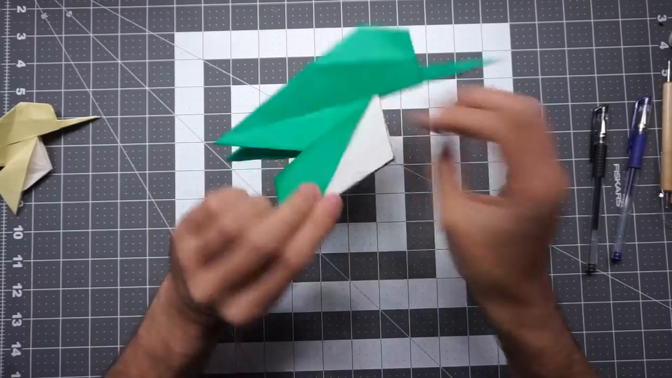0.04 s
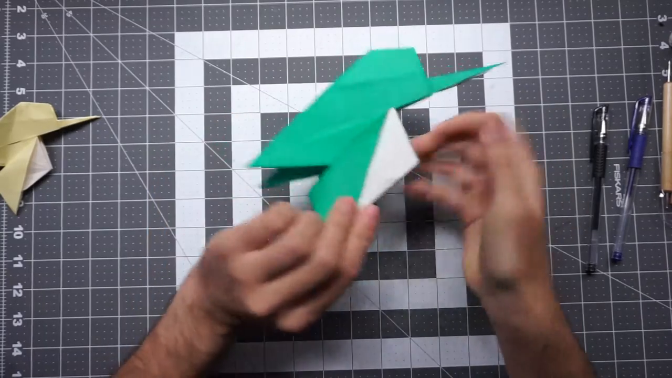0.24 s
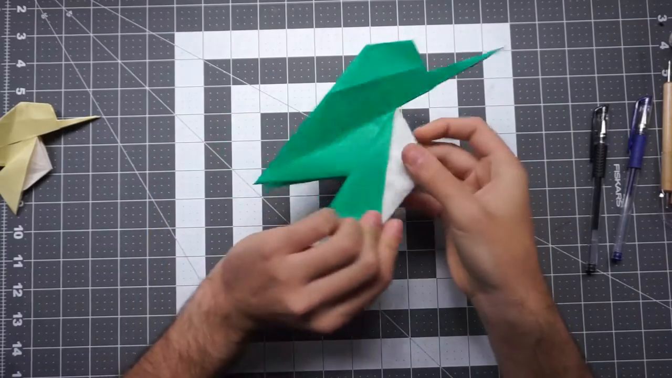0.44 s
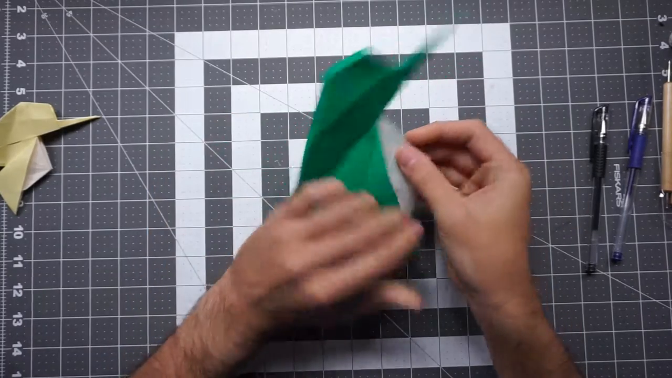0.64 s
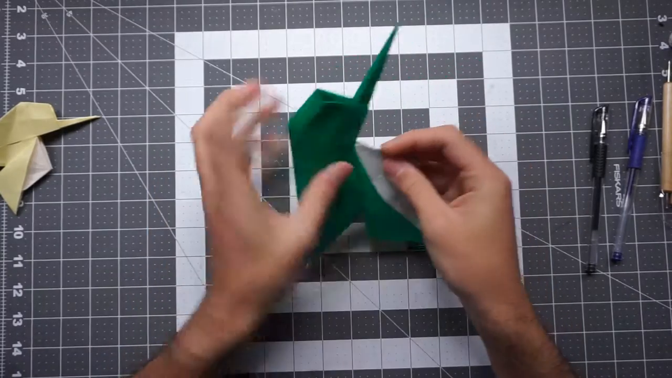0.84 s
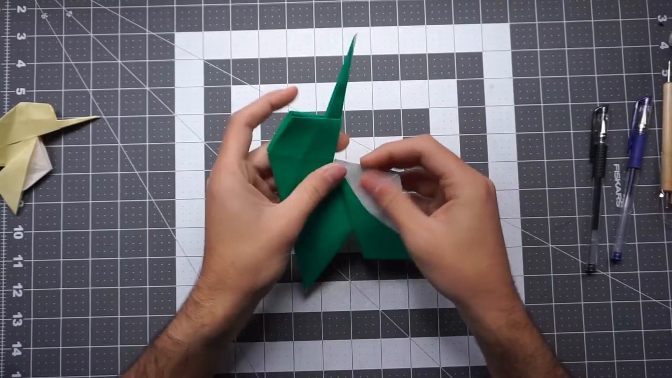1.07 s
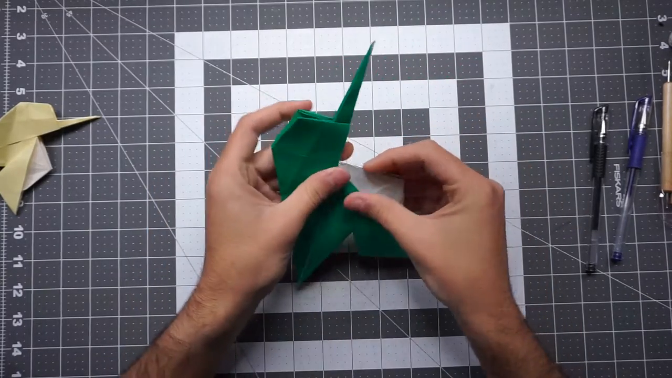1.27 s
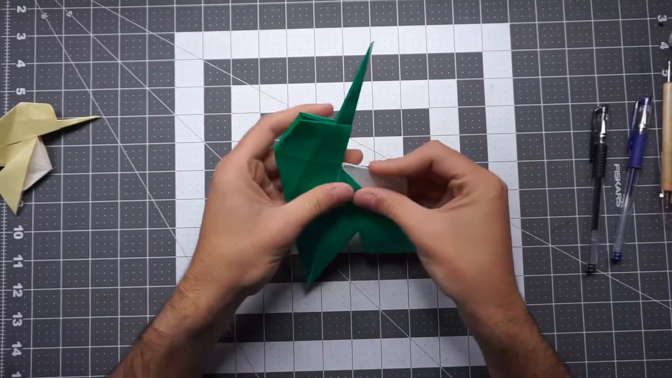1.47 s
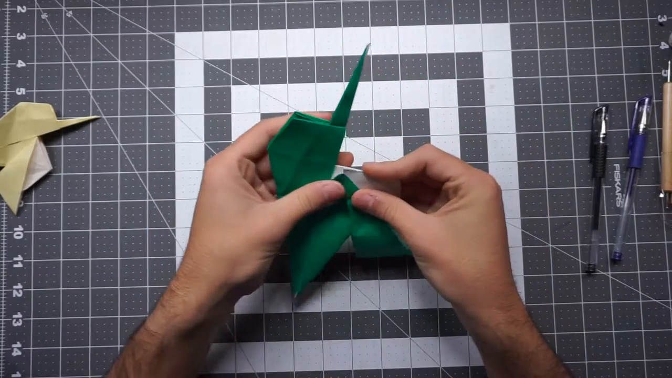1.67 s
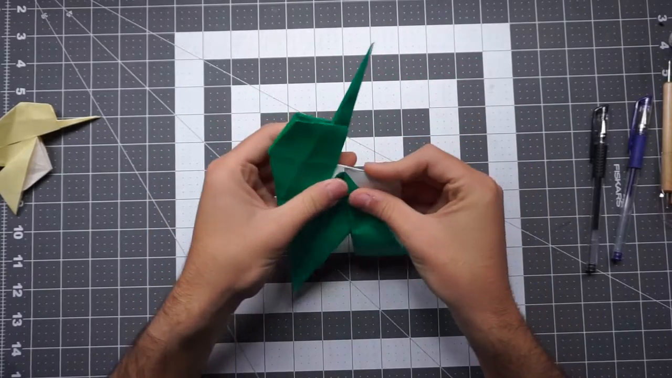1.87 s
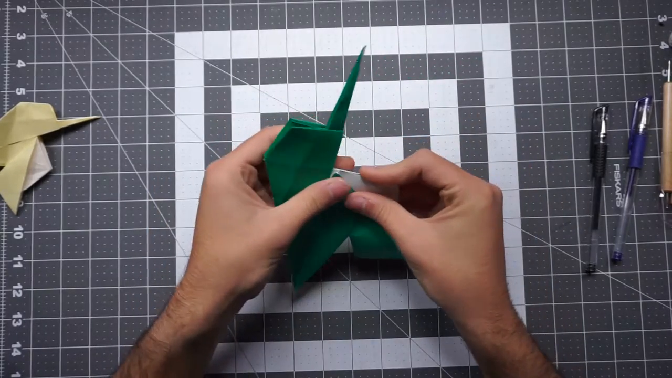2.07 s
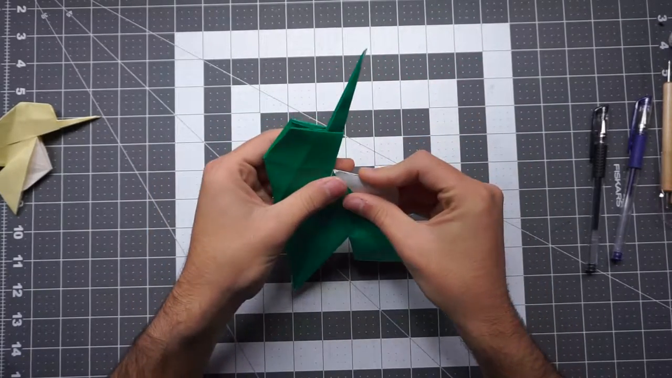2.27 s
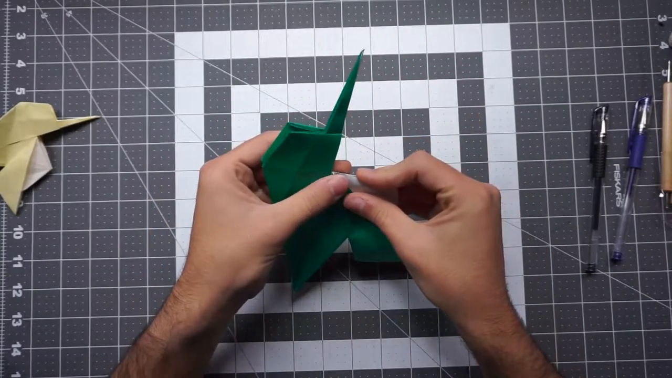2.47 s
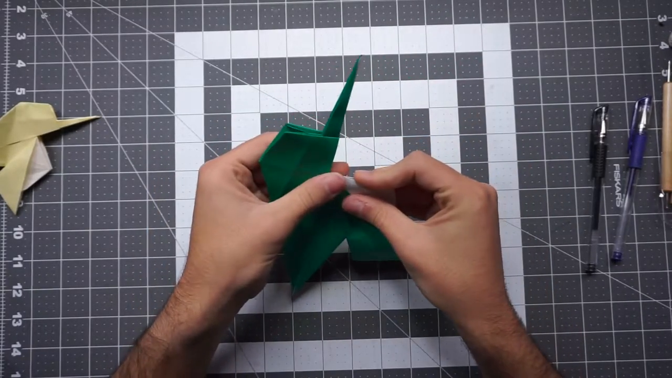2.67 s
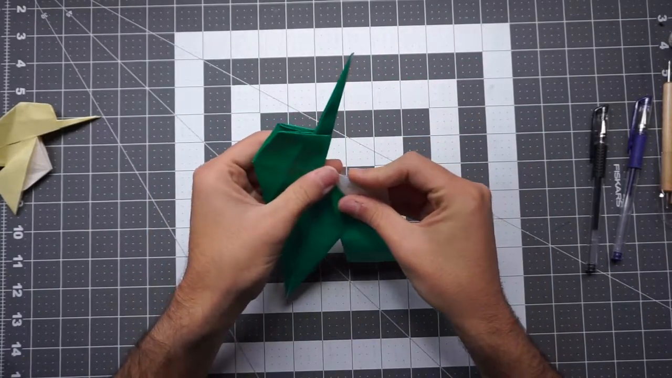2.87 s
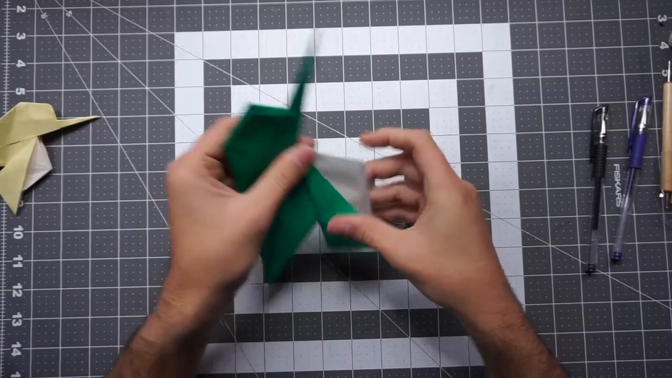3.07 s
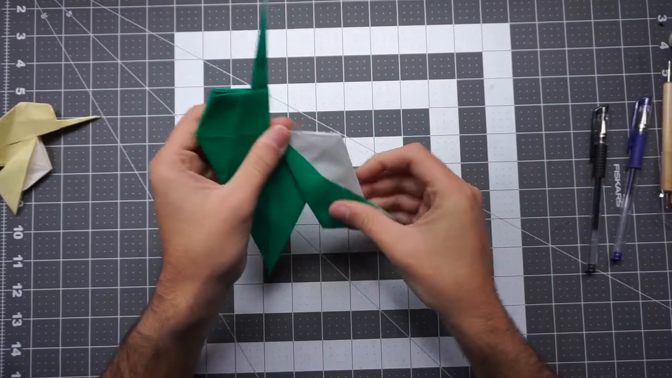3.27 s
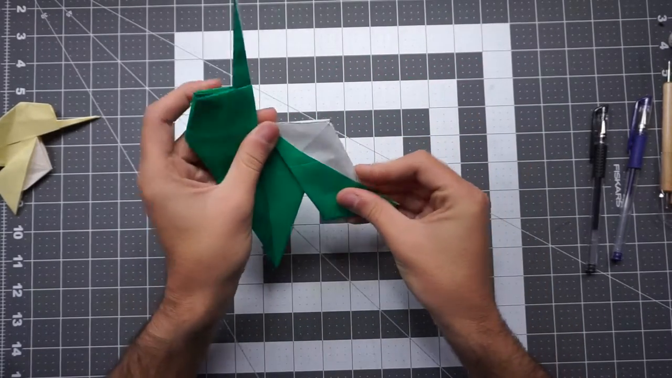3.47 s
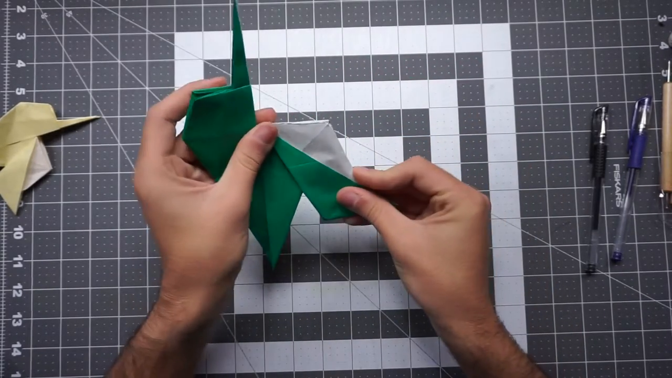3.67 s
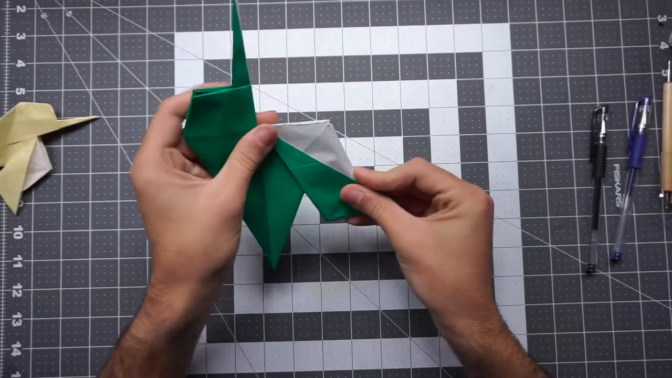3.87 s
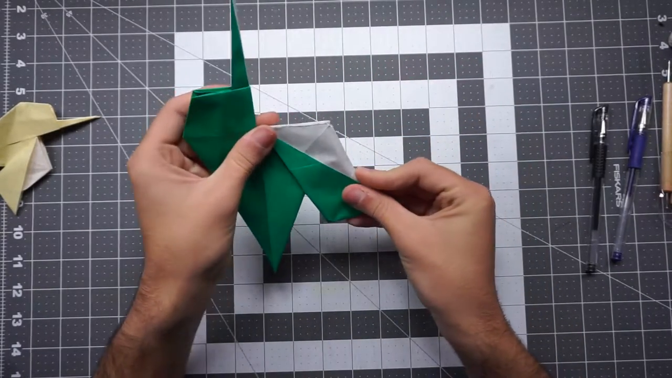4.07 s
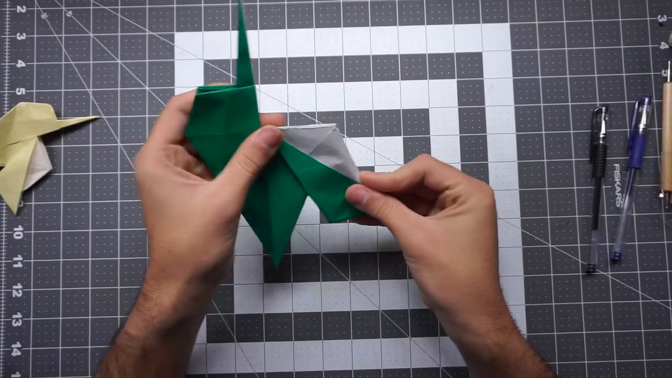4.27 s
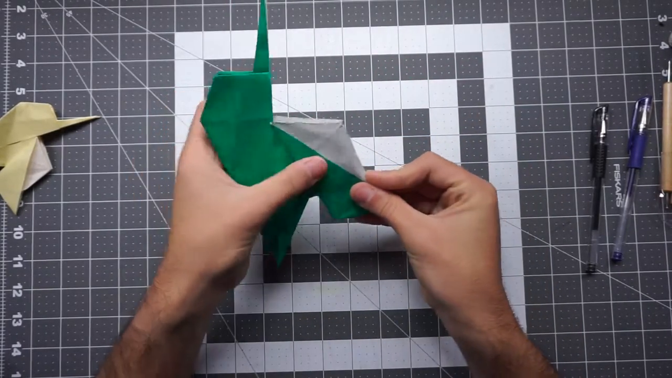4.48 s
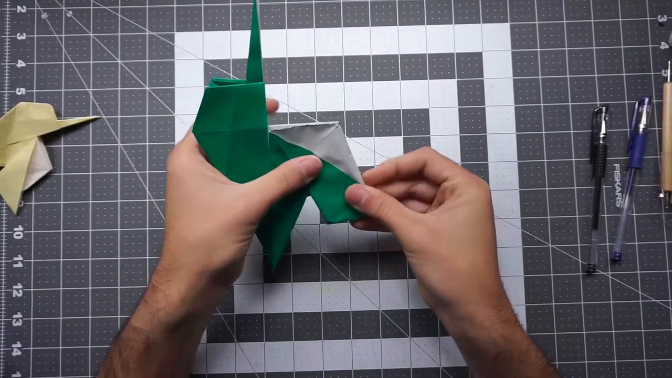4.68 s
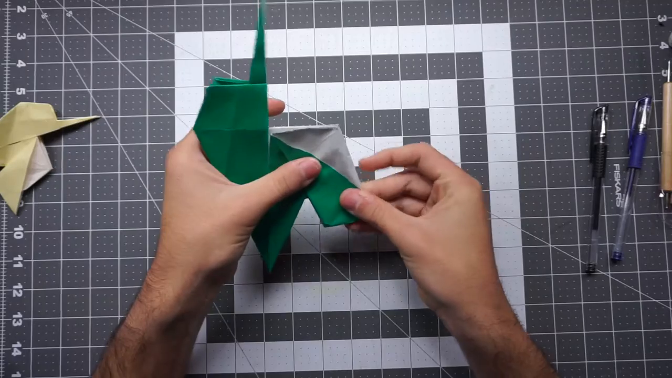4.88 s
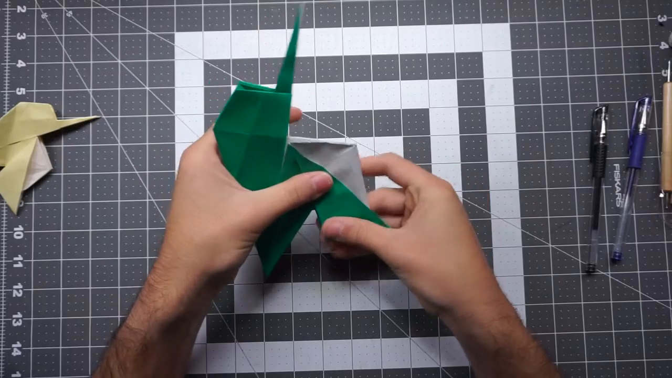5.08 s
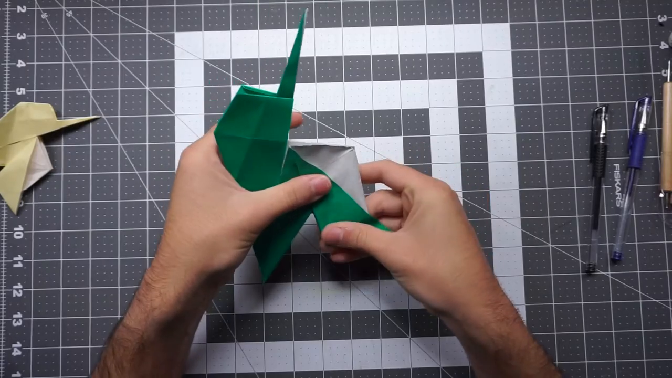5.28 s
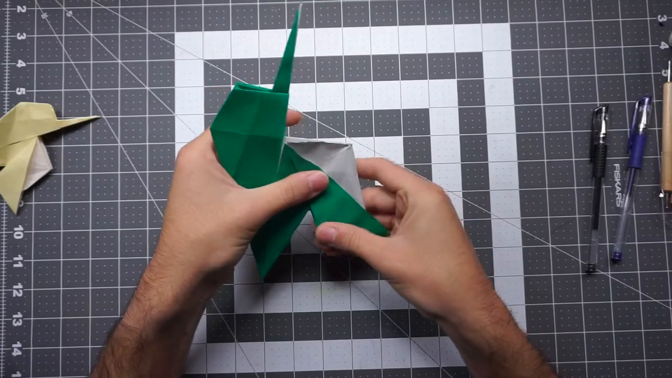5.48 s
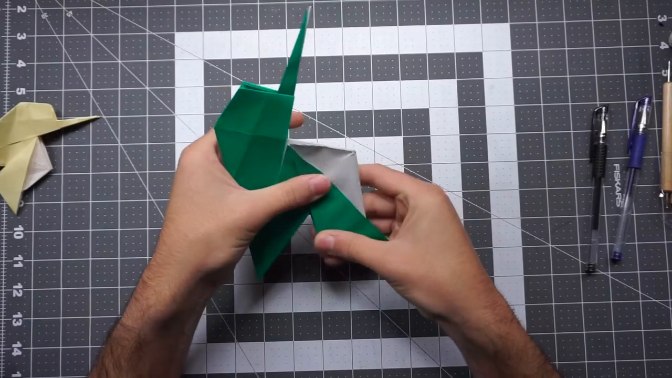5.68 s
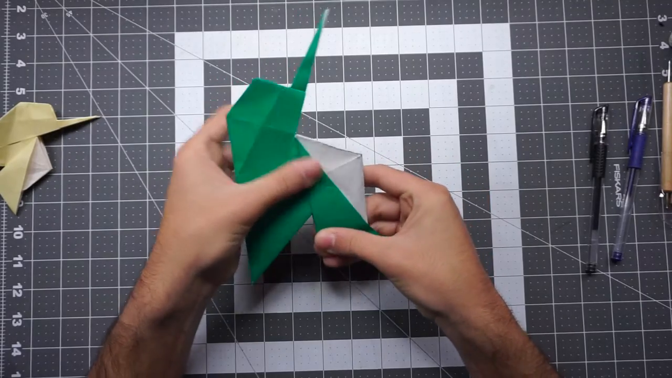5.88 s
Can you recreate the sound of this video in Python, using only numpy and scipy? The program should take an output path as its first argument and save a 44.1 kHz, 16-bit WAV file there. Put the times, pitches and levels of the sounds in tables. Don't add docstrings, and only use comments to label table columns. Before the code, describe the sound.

Stiff paper is folded close up, with bright sliding hiss, crisp creasing snaps and crackles, over quiet room noise and faint traffic rumble.

```python
import sys
import numpy as np
from scipy import signal
from scipy.fft import rfft, irfft, next_fast_len
from scipy.io import wavfile
from scipy.ndimage import uniform_filter1d, map_coordinates

SR = 44100
rng = np.random.default_rng(int(sys.argv[2]) if len(sys.argv) > 2 else 0)


def boost(x):
    u = np.asarray(x, float) / 20
    return 10 ** u


def to_wav(sig):
    pcm = np.clip(np.atleast_2d(sig), -1, 1) * 32767
    pcm = np.round(pcm).astype(np.int16)
    wavfile.write(sys.argv[1], SR, pcm.T)


N = 261513


def unit(x):
    return x / np.sqrt(np.mean(x ** 2) + 1e-20)


def along(points, hz):
    f, v = np.transpose(points)
    return np.interp(np.log(hz + 1), np.log(f + 1), v)


def curve(points):
    s, v = np.transpose(points)
    return np.interp(np.arange(N) / SR, s, v)


def wobble(rate_hz):
    knots = rng.standard_normal(int(N * rate_hz / SR) + 4)
    return map_coordinates(knots, [np.arange(N) * rate_hz / SR])


def filtered(x, response):
    m = next_fast_len(N + SR // 2)
    hz = np.fft.rfftfreq(m, 1 / SR)
    return irfft(rfft(x, m) * response(hz), m)[..., :N]


def pair(source, spectrum, alike):
    def response(hz):
        turn = np.arccos(np.clip(along(alike, hz), -1, 1)) / 2
        return boost(along(spectrum, hz)) * [np.cos(turn), np.sin(turn)]

    mid, side = filtered(source, response)
    return unit(np.array([mid + side, mid - side]))


def sides(pan_db):
    return boost(np.array([pan_db / 2, -pan_db / 2]))


def swells(s, db, rise_s, fall_s):
    hop = 64
    late_s = np.arange(0, N + hop, hop)[:, None] / SR - s
    drop_db = 20 * np.where(late_s < 0, -late_s / rise_s, late_s / fall_s)
    power = boost(2 * (db - drop_db)).sum(1)
    return np.interp(np.arange(N) / hop, np.arange(len(power)), np.sqrt(power))


def air():
    # f/Hz, density/dB
    rumble_spectrum = [(12, -51), (20, -15), (95, -11.5), (127, -10), (227, -15.5), (337, -25.5),
                       (365, -37), (700, -72)]
    # f/Hz, density/dB
    floor_spectrum = [(150, -45), (337, -27.5), (416, -31), (463, -31), (872, -30.5), (1060, -27.5),
                      (1260, -33.5), (11000, -47.5)]
    # f/Hz, correlation/1
    alike = [(30, 1), (125, 0.82), (300, 0.051), (600, 0.083), (1000, 0.093), (3000, 0.048), (10000, 0.1)]
    # t/s, level/dB
    swell = [(0, -61), (1.7, -63), (2.4, -64), (4.2, -58.5), (4.6, -62.5), (5.93, -61)]
    noise = rng.standard_normal((2, 2, N))
    rumble = pair(noise[0], rumble_spectrum, alike)
    rest = pair(noise[1], floor_spectrum, alike)
    rumble_db = curve(swell) + 1.1 * wobble(4.08)
    return boost(rumble_db) * rumble + boost(-59) * rest


def grit(rate_hz, spread_db, patchy_db, smooth):
    size = (rng.random(N) < rate_hz / SR) * boost(spread_db * np.minimum(rng.exponential(size=N), 2.2))
    ticks = unit(size * rng.standard_normal((2, N))) + smooth * rng.standard_normal((2, N))
    z = signal.stft(ticks, nperseg=128)[2]
    field = uniform_filter1d(rng.standard_normal(z.shape[1:]), size=2, axis=0)
    field = uniform_filter1d(field, size=16, axis=1)
    clumps_db = patchy_db * 1.1 * wobble(110)
    patched = signal.istft(z * boost(patchy_db * unit(field)), nperseg=128)[1][:, :N]
    return boost(clumps_db) * patched


def slides():
    # f/Hz, density/dB
    hiss_spectrum = [(1500, -51), (3000, -24), (4000, -11), (5500, -6.5), (8000, -3), (11000, 0.5)]
    # f/Hz, density/dB
    rustle_spectrum = [(200, -12), (500, -3.5), (1000, -3), (2000, 0.5), (3000, -1.5), (4200, 1),
                       (6000, -8), (11000, -7)]
    # most pressure t/s, skin hiss level/dB, sheet rustle level/dB, rise/s, fall/s (20 dB)
    strokes = [(0.0, -42, -46, .05, 0.7), (0.285, -28, -32.5, 0.017, 0.021), (.37, -32, -44, 0.033, 0.022),
               (.478, -26.5, -36, 0.058, 0.062), (.56, -33.5, -47, 0.1, 0.15),
               (.663, -33.5, -47, .15, 0.029), (.78, -34.5, -40.5, 0.038, 0.025),
               (0.903, -35.5, -48, 0.05, 0.63), (1.345, -38, -43.5, .04, 0.06),
               (1.521, -42.5, -50, 0.047, 0.11), (1.645, -54.5, -52.5, 0.16, 0.16),
               (1.958, -32, -50, 0.055, 0.025), (1.99, -52, -62, .2, .2),
               (2.847, -55.5, -65.5, 0.28, 0.075), (2.996, -34.5, -46.5, 0.032, 0.29),
               (3.214, -35, -44.5, 0.12, 0.05), (3.38, -42.5, -53.5, 0.12, 0.094),
               (4.187, -63, -69, 0.071, 0.05), (4.387, -35, -40, 0.061, 0.12),
               (4.586, -46, -45, 0.36, 0.12), (4.992, -36, -60, 0.053, 0.13),
               (5.097, -62, -49.5, 0.047, 0.056), (5.411, -49.5, -55, 0.15, 0.22),
               (5.827, -39, -38, 0.044, 0.078), (5.93, -32.5, -53, 0.11, .1)]
    rest_hiss_db, rest_rustle_db = -64, -66.5
    dwell_s = 0.01
    sheet_lag = 1.14
    s, hiss_db, rustle_db, rise_s, fall_s = np.transpose(strokes)
    hiss = grit(rate_hz=5200, spread_db=4, patchy_db=3, smooth=1.6)
    hiss = pair(hiss, hiss_spectrum, [(3000, 0.62)])
    rustle = grit(rate_hz=700, spread_db=3.5, patchy_db=2.5, smooth=1.16)
    rustle = pair(rustle, rustle_spectrum, [(1200, 0.85), (3000, 0.4)])
    skin = uniform_filter1d(swells(s, hiss_db + 0.5, rise_s, fall_s), round(dwell_s * SR))
    skin = skin + boost(rest_hiss_db)
    sheet = swells(s, rustle_db + 2.0, sheet_lag * rise_s, sheet_lag * fall_s) + boost(rest_rustle_db)
    return sides(1.4 * wobble(3.13)) * (skin * hiss + sheet * rustle)


def rattle():
    # f/Hz, density/dB
    resonances = [(870, -24), (940, 3), (1000, 1.5), (1065, 5.5), (1125, -6), (1192, -1), (1260, -24)]
    # t/s, level/dB
    pulses = [(.01, -54), (.16, -57), (.37, -57), (.49, -50), (.7, -55), (.76, -58), (.93, -55),
              (.97, -56), (1.03, -59), (1.09, -59), (1.17, -60), (1.24, -59), (1.37, -53), (1.45, -54),
              (1.49, -57), (1.56, -57), (1.61, -58), (1.69, -58), (1.76, -59), (1.83, -61), (1.91, -58),
              (1.97, -61), (2.04, -61), (2.1, -58), (2.17, -58), (2.23, -62), (2.49, -59), (2.56, -57),
              (2.63, -60), (2.69, -59), (2.77, -63), (2.83, -63), (2.9, -61), (2.97, -55), (3.03, -58),
              (3.1, -58), (3.3, -56), (3.37, -56), (3.43, -55), (3.55, -62), (3.69, -63), (3.76, -61),
              (3.92, -63), (4.03, -56), (4.08, -60), (4.27, -62), (4.46, -56), (4.58, -56), (4.94, -58),
              (5.29, -63), (5.38, -61), (5.5, -60), (5.57, -60), (5.63, -60), (5.71, -62), (5.77, -60),
              (5.88, -58)]
    hum = pair(rng.standard_normal((2, N)), resonances, [(1000, 0.94)])
    power = np.abs(uniform_filter1d(hum.mean(0) ** 2, size=700))
    steady = unit(hum / np.sqrt(power + .05))
    flutter_db = 1.5 * wobble(40)
    s, db = np.transpose(pulses)
    return swells(s, db + 4, rise_s=.035, fall_s=.045) * boost(flutter_db) * steady


def bursts(rows, length_ms, thud_db, rise_share, crack, facet_db):
    size = 2048
    out = np.zeros((2, N + size))
    t, hz = np.arange(size) / SR, np.fft.rfftfreq(size, 1 / SR)
    delay_s = np.array([[.0013], [.00136]])
    bounce = 1 + .4 * np.exp(-2j * np.pi * hz * delay_s)
    apart = along([(500, 0.2), (1200, 0.2), (2500, 0.43), (9000, 0.33)], hz)
    life_s = (length_ms - 1.2) / 1000
    shape = (1 - np.exp(-t / (rise_share * life_s))) * (boost(-9 * t / life_s) + boost(-17.5 - 60 * t / 0.042))
    shape[:16] *= 1 + crack / length_ms
    body_band = (hz > 1300) & (hz < 6500)
    for s, db, facet_hz, edge_db in rows:
        shiver = rfft(shape * rng.standard_normal((3, size)))
        even = uniform_filter1d(np.abs(shiver[0]) ** 2, size=50) ** .45
        tilt = [(250, thud_db - 11.5), (1050, thud_db + 6.5), (facet_hz, -3), (8500, edge_db - 0.5)]
        colour_db = along(tilt, hz) + facet_db * np.exp(-(np.log(hz / facet_hz + 1e-9) / 0.28) ** 2)
        cep = irfft(np.log(boost(colour_db) / even), size)
        cep[1:size // 2] *= 2
        cep[size // 2 + 1:] = 0
        snap = (shiver[0] + apart * shiver[1:]) * bounce * np.exp(rfft(cep))
        body = np.linalg.norm(snap.mean(0)[body_band]) / np.sqrt(size / 2)
        gain = boost(db + 23.5) * sides(rng.normal(.3, 1.0))[:, None]
        out[:, round(s * SR):][:, :size] += gain * irfft(snap, size) / body
    return out[:, :N]


def creases():
    # t/s, body level/dB, facet f/Hz, edge level/dB
    crackles = [(.0355, -35.5, 2900, -3.5), (.2555, -45.5, 1720, -27), (.3008, -41, 1530, 3),
                (.4288, -35, 3100, -12), (.4695, -30, 4060, 1), (.4754, -36.5, 6500, 12.5),
                (.4927, -31, 4400, -5), (.282, -37, 2180, -7.5), (.5535, -27, 4040, -1),
                (.5485, -32, 4500, -3), (.0125, -36, 4640, 0), (2.944, -45.5, 1690, -1),
                (1.0207, -45.5, 4410, 10), (1.328, -36, 2420, -8), (1.406, -44.5, 4200, -1),
                (5.091, -37, 2030, -2), (2.6892, -53.5, 1290, 15), (2.9833, -47, 2140, 11),
                (3.5743, -60, 1300, -14), (4.2929, -54, 1300, -22), (4.5985, -47, 2400, -12),
                (5.4797, -61, 2260, 2), (4.9202, -46.5, 1290, -11), (4.9554, -49, 1540, -13),
                (5.0969, -42, 1280, -6), (5.2449, -47, 1260, -11), (5.5154, -45, 6300, 6),
                (5.733, -49, 5500, 1)]
    flecks = [(.0155, -38, 5000, -2), (.041, -38, 3000, 0), (.265, -56, 6500, 14), (.4375, -40, 2000, -6),
              (.4772, -33, 3000, 8), (.482, -34, 3200, -2), (.5, -38, 3500, 2), (.785, -44, 3000, 0),
              (1.024, -44, 4000, 2), (1.042, -47, 1500, 4), (1.234, -56, 2500, 6), (1.3215, -38, 3800, -10),
              (1.58, -47, 1800, -4), (1.606, -51, 2500, -10), (1.70, -54, 3000, -10),
              (1.905, -50, 1500, -10), (2.949, -47, 1700, 0), (2.973, -51, 1250, -12),
              (2.996, -46, 1500, -6), (3.066, -45, 3800, -4), (3.075, -43, 2000, -8),
              (3.194, -43, 2000, -6), (4.372, -42, 2500, 4), (4.56, -39, 2200, 2), (4.634, -53, 1250, -12),
              (5.082, -43, 3000, -2), (5.1, -45, 2500, 0), (5.481, -51, 2500, -6), (5.5155, -48, 1150, 0),
              (5.678, -55, 6500, 8), (5.8015, -37, 2500, -20), (5.8205, -35, 4200, 8),
              (5.8365, -38, 1500, -4), (5.846, -42, 2000, 0), (5.893, -43, 2200, 0), (5.916, -52, 6500, 12),
              (.649, -46, 2000, -8), (3.161, -45, 2000, -4), (3.486, -47, 4500, 0)]
    ticks = [(.1713, -42, 3040, -13), (.1969, -25, 4330, -2.5), (.333, -51, 6400, 16),
             (.4083, -34, 1230, -16), (.7692, -36.5, 2580, -0.5), (1.6528, -28, 4500, -11),
             (3.2053, -23.5, 1850, 3.5), (3.3668, -29.5, 5900, 6), (3.3982, -41.5, 3530, -12),
             (3.4674, -51, 6500, 3), (3.4801, -44, 1560, -4), (3.5873, -39, 4040, -13.5),
             (3.6027, -43, 1850, -26), (3.8429, -42, 4100, 1.5), (4.1589, -42.5, 1850, -16),
             (4.1768, -31, 1650, -6.5), (4.4607, -31.5, 2700, -2.5), (4.5104, -29, 6400, 3),
             (4.5172, -28.5, 4050, -4), (4.5392, -42, 2670, -10.5), (4.5527, -34.5, 6240, 10),
             (4.5568, -38, 2150, -3), (4.5748, -26, 4600, -2), (4.5817, -30, 6330, 8),
             (5.1546, -47, 2630, -1), (5.2043, -42.5, 3300, -23), (5.2492, -48.5, 6060, 7),
             (5.3585, -42.5, 6500, 1), (5.6388, -47.5, 3500, 3), (5.8131, -27, 6320, -1.5)]
    brushes = [(.205, -49, 4440, -10.5), (.3717, -42, 5500, -9), (.458, -43.5, 6540, 20.5),
               (.5622, -39, 3530, 17), (.8874, -42, 6400, 12.5), (.8959, -44.5, 6300, 18.5),
               (.945, -48, 6500, 17), (.62, -49, 6500, 14), (1.1415, -48, 1570, -11),
               (1.2333, -52, 1290, 1), (1.2582, -51, 1320, 5), (1.334, -43, 6500, 9),
               (1.9162, -50.5, 1400, -14), (2.1039, -46, 4600, 2.5), (2.442, -52.5, 1920, -2),
               (2.572, -55, 4500, 10.5), (2.9732, -50, 1300, -8), (3.0701, -39, 1620, 2),
               (3.3335, -46.5, 6060, -2), (4.4239, -37, 1370, 1.1), (4.9702, -49, 2900, -3),
               (.44, -38, 3000, 1), (.505, -42, 4000, 6), (3.03, -53, 3000, 7), (3.11, -59, 4000, 10),
               (5.6336, -52, 6740, 10), (5.8442, -50, 2140, -7)]
    snaps = [
        (.273, -26.5, 3620, -1.5),
        (.5372, -31, 4660, -5),
        (.655, -27, 4130, -4),
        (.6595, -30.5, 2270, -4),
        (1.5078, -26, 2900, -5),
        (1.5178, -26, 4000, -2.5),
        (2.3751, -39.5, 2570, -17.5),
    ]
    knocks = [(.819, -30.5, 2560, -3), (1.1214, -38, 2880, 5), (1.4484, -50.5, 1310, -16),
              (2.9853, -45, 2100, 3), (3.137, -56, 2100, -9), (3.1546, -39, 1470, -6),
              (3.2022, -35.5, 3560, -28), (3.4912, -39, 2550, -5), (3.8341, -45.5, 1950, -8),
              (4.3258, -37, 1220, -4), (4.3374, -39, 6500, -3), (4.3446, -38, 6500, 4.5),
              (4.3797, -30.5, 4410, 1.5), (4.3936, -37, 3570, -4), (4.5046, -32, 2560, 2),
              (4.6721, -39.5, 1150, -10), (4.7134, -41, 1670, -3), (4.793, -43.5, 1580, -9.5),
              (4.8093, -42, 1560, -17), (4.8244, -32.5, 2650, -10), (4.8487, -39, 1180, -20),
              (4.8933, -37.5, 1580, -16), (4.974, -40.5, 2820, -1), (5.0955, -39, 2050, -4),
              (5.4085, -34.5, 5300, 1.5), (5.529, -39, 1800, -6), (5.805, -46, 1260, -18),
              (5.819, -39, 1260, 1), (5.8394, -35, 2080, 2)]
    scrapes = [(1.783, -54, 1570, -13), (1.8186, -57, 1370, -20), (2.388, -54, 1900, -17),
               (2.4848, -59, 1300, -19), (2.8341, -45, 1820, 2.5), (4.438, -36, 3700, 5),
               (4.729, -55, 1540, 5), (5.082, -49, 2000, -8), (5.648, -58, 3680, 8),
               (5.6759, -49, 3730, 12.5), (5.70, -58, 3700, 7), (5.891, -45, 2180, 4)]
    return (bursts(crackles, length_ms=5.2, thud_db=-8, rise_share=0.28, crack=.7, facet_db=5)
            + bursts(flecks, length_ms=3.2, thud_db=-9, rise_share=0.2, crack=.8, facet_db=7)
            + bursts(ticks, length_ms=2.86, thud_db=-12.5, rise_share=0.14, crack=2.6, facet_db=9)
            + bursts(brushes, length_ms=16.3, thud_db=-7.5, rise_share=0.13, crack=0, facet_db=8)
            + bursts(snaps, length_ms=3.9, thud_db=-9.5, rise_share=0.11, crack=3.2, facet_db=5.5)
            + bursts(knocks, length_ms=3.25, thud_db=-2.5, rise_share=0.05, crack=0.89, facet_db=7)
            + bursts(scrapes, length_ms=13, thud_db=-14, rise_share=0.39, crack=0, facet_db=16.5))


def whistles():
    # t/s, level/dB, pitch f/Hz, half length/s (20 dB), width/pitch
    drags = [(.07, -54, 4800, .1, .12), (.14, -56, 4900, .08, .12), (.9, -52, 7800, .04, .06),
             (.955, -49, 7900, .05, .08), (.905, -55, 3900, .05, .08), (.905, -47, 10000, .04, .08),
             (.955, -49, 2000, .03, .25), (1.012, -42, 9000, .02, .25), (1.135, -49, 2600, .022, .5),
             (1.356, -41, 9000, .018, .3), (1.642, -49, 9000, .025, .3), (1.948, -42, 9000, .028, .28),
             (1.95, -54, 3800, .04, .08), (3.02, -53, 4800, .06, .08), (3.23, -54, 4900, .06, .08),
             (4.455, -43, 9500, .025, .2), (4.545, -44, 9500, .015, .25), (5.063, -50, 9500, .03, .2),
             (5.667, -55, 3750, .04, .07), (.49, -43, 850, .03, .3), (4.842, -46, 950, .03, .2),
             (.832, -43, 2600, .025, .45)]
    size = SR // 2
    out = np.zeros((2, N + SR))
    noise = rng.standard_normal((len(drags), 3, size))
    t, f = np.arange(size) / SR - .25, np.fft.rfftfreq(size, 1 / SR)
    for (s, db, hz, half_s, width), (both, *each) in zip(drags, noise):
        band = np.exp(-((f / hz - 1) / width) ** 2)
        tone = unit(irfft(rfft(both + .45 * np.array(each)) * band, size))
        out[:, round((s + .25) * SR):][:, :size] += boost(db - 20 * (t / half_s) ** 2) * tone
    return out[:, size:][:, :N]


def thumps():
    # t/s, peak level/dB
    contacts = [
        (0.82, -49),
        (.89, -56),
        (3.202, -46),
        (4.173, -56),
        (5.087, -55),
    ]
    out, t = np.zeros(N + SR), np.arange(SR // 4) / SR
    for s, db in contacts:
        out[round(s * SR):][:len(t)] += boost(db + 18.5 - 60 * t / 0.19) * rng.standard_normal(len(t))
    centre_hz, width_hz = 320, 170
    return filtered(out[:N], lambda f: 1.25j * f * width_hz / (centre_hz ** 2 - f * f + 1j * f * width_hz))


def engine():
    # t/s, level/dB
    load = [(2.5, -84), (2.64, -67), (2.85, -58.5), (3.05, -60), (3.3, -55.5), (3.5, -57), (4.1, -51.5),
            (4.42, -59.5), (4.52, -80), (4.78, -60), (4.87, -70), (4.98, -60), (5.3, -54.5), (5.55, -63),
            (5.62, -70), (5.75, -59), (5.83, -68), (5.93, -59)]
    t = np.arange(N) / SR - 2.78
    start_hz, climb_hz_per_s, climb_hz_per_s2 = 122, 3.3, .8
    hz = start_hz + climb_hz_per_s * t + climb_hz_per_s2 * t * t
    level_db = curve(load) + 1 + 2.2 * wobble(6.0)
    return boost(level_db) * np.sin(2 * np.pi * np.cumsum(hz + 0.47 * wobble(5.9)) / SR)


def room(x):
    # f/Hz, t60/s
    decay = [(300, 0.41), (1500, 0.21), (4000, 0.23), (10000, 0.15)]
    hz, t, z = signal.stft(rng.standard_normal((2, SR // 3)), SR, nperseg=256)
    tail = signal.istft(z * boost(-60 * t / along(decay, hz)[:, None]), SR, nperseg=256)[1]
    delayed = np.pad(x, (200, 0))[None]
    return signal.fftconvolve(delayed, tail / np.linalg.norm(tail[0]), axes=1)[:, :N]


def scene():
    # f/Hz, left over right level/dB
    ports = [(300, -.4), (1500, -2.2), (3000, -1), (5000, .7), (10000, .8)]
    background = air() + rattle() + engine()
    paper = slides() + creases() + whistles() + thumps()
    near = filtered(paper, lambda hz: sides(along(ports, hz)))
    return near + boost(-9.5) * room(paper.mean(0)) + background


def low_pass(x):
    return signal.sosfilt(signal.butter(12, 12390, fs=SR, output="sos"), x)


def record(dry):
    # f/Hz, level/dB
    roll_off = [(11000, 0), (11090, -38), (12500, -62)]
    mix = filtered(dry, lambda hz: boost(along(roll_off, hz)))
    return low_pass(mix)


dry = scene()
out = record(dry)
to_wav(out)
```